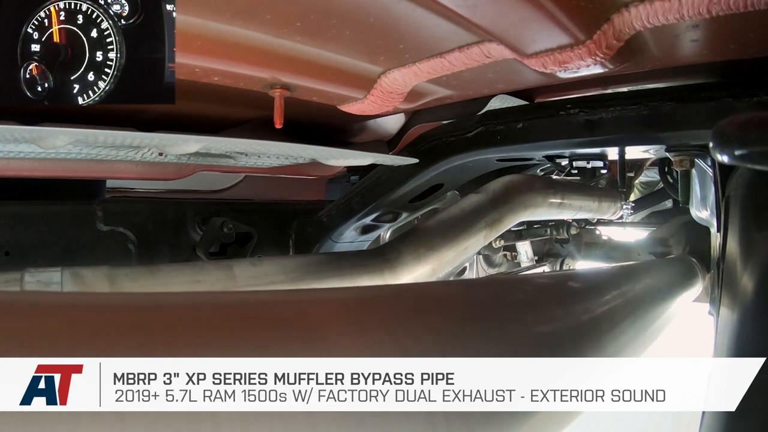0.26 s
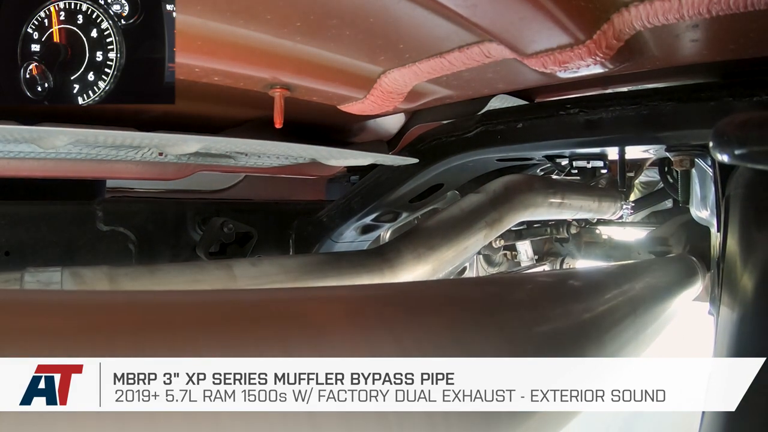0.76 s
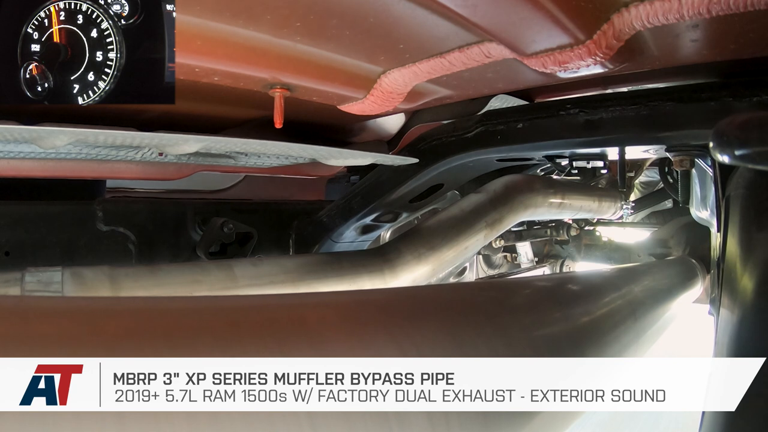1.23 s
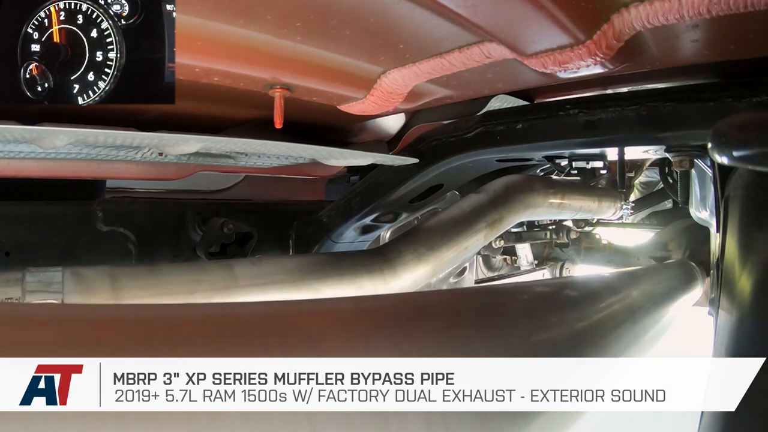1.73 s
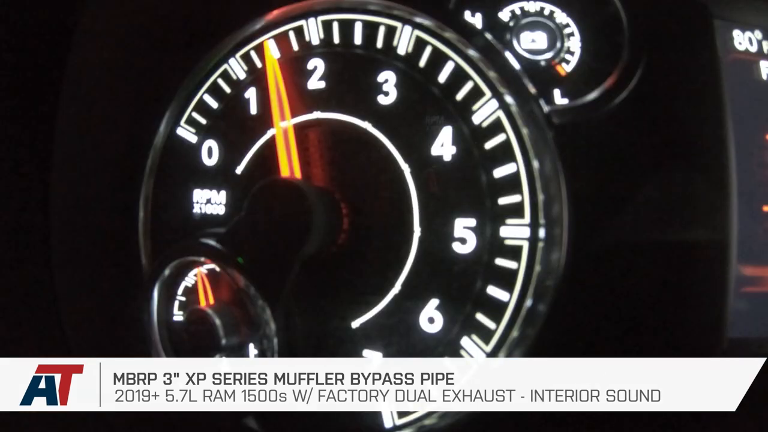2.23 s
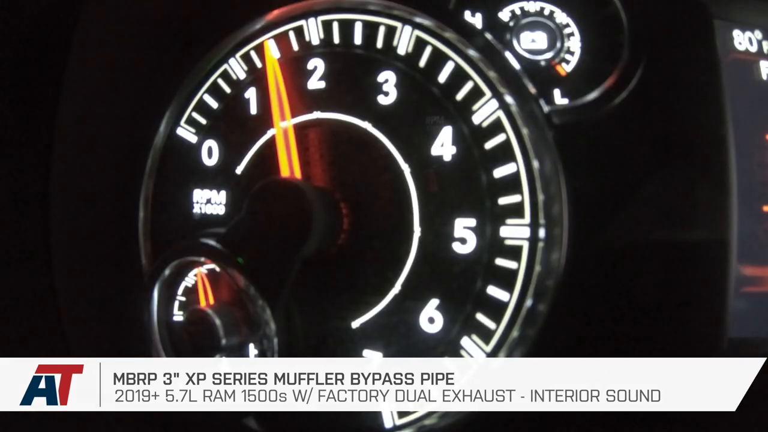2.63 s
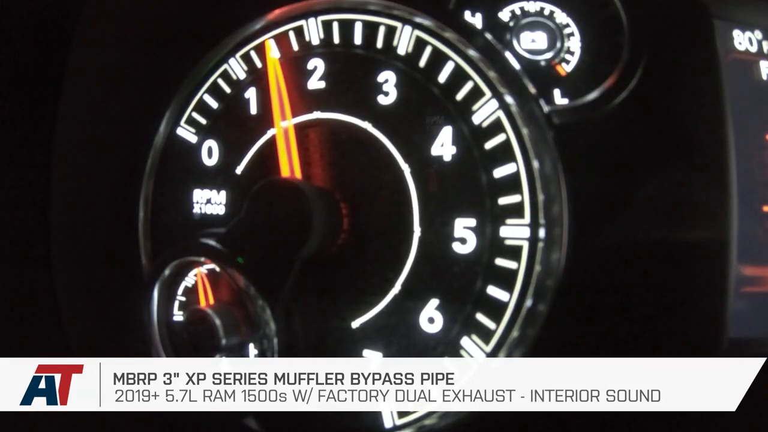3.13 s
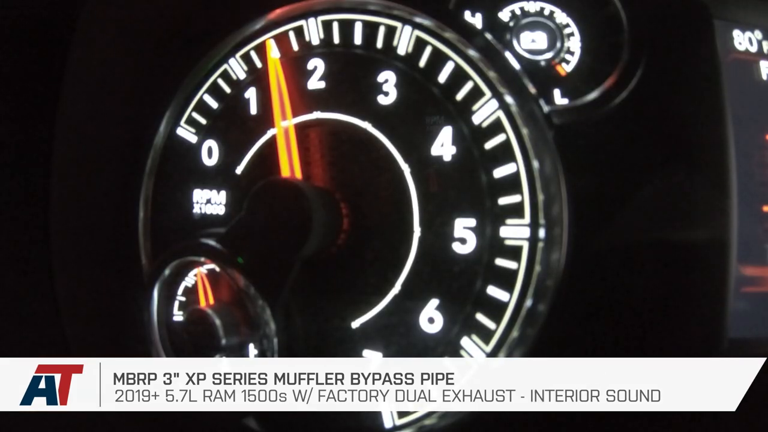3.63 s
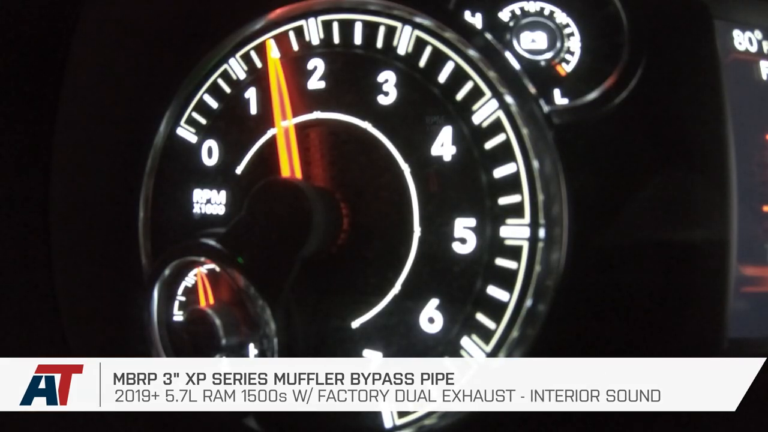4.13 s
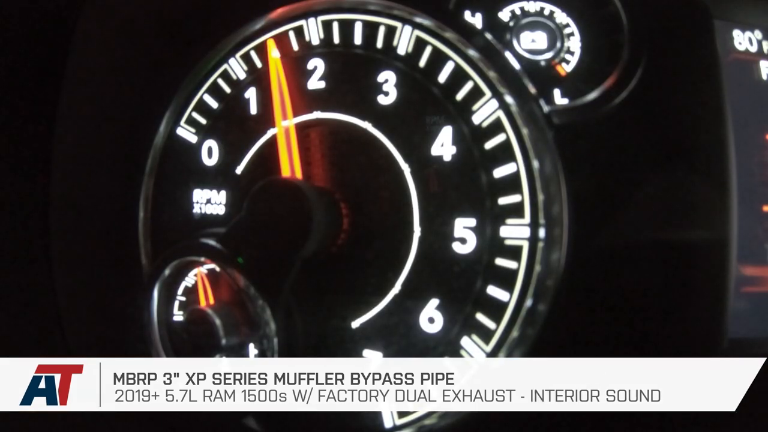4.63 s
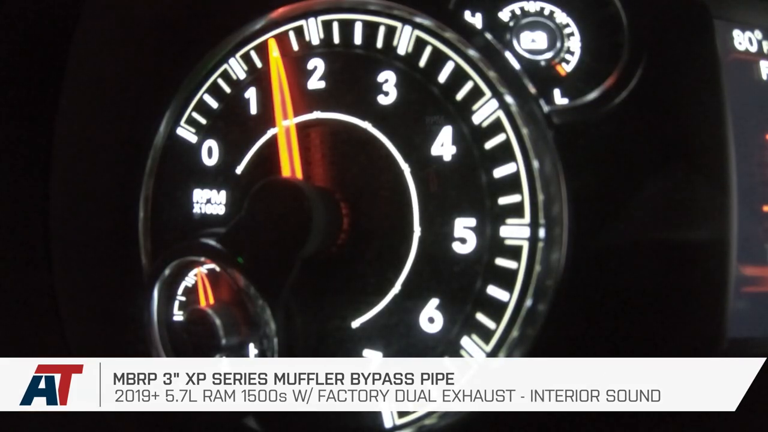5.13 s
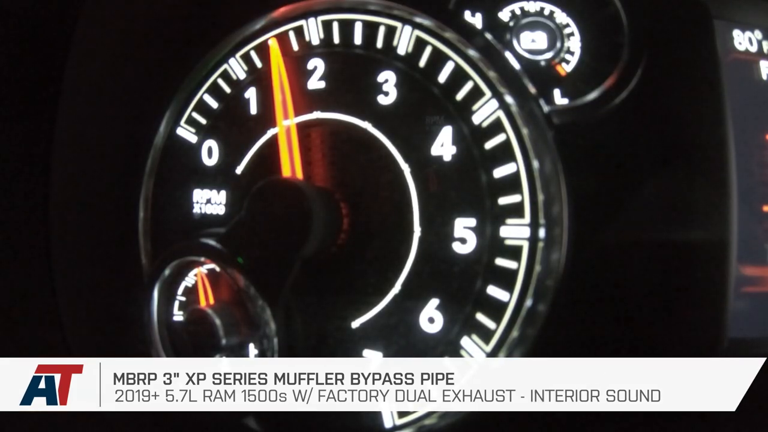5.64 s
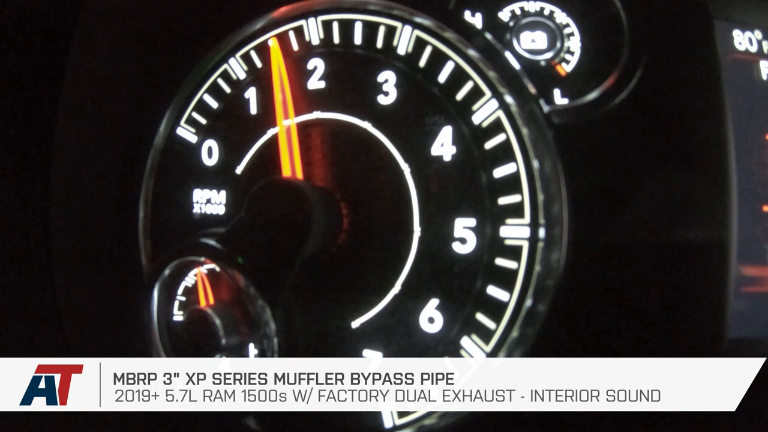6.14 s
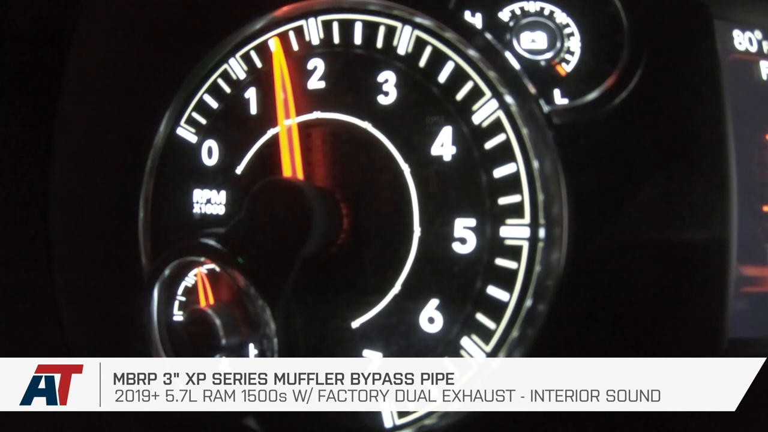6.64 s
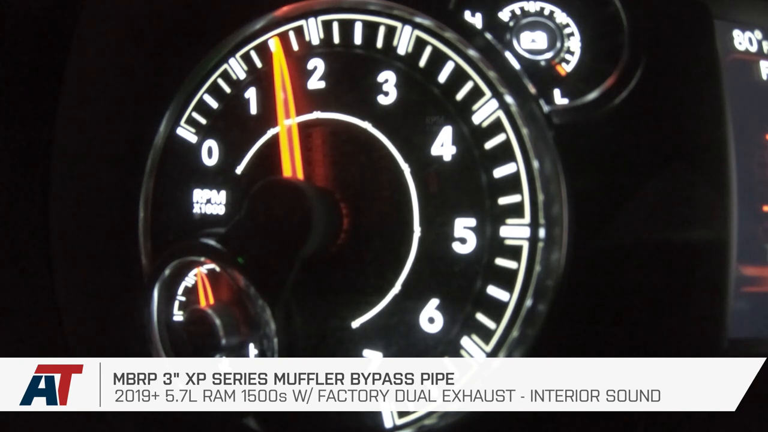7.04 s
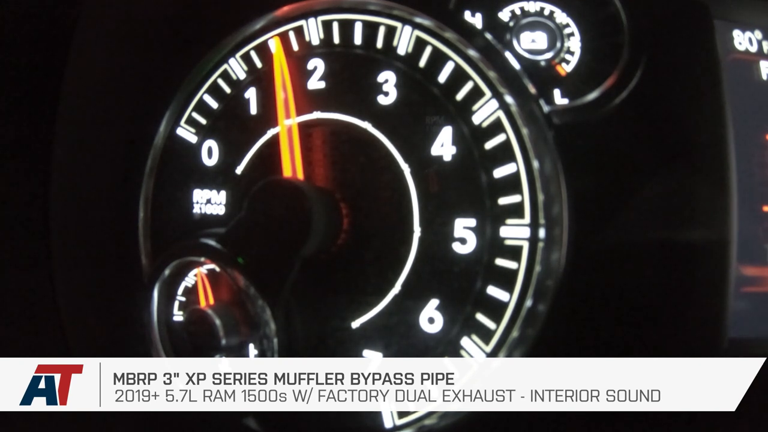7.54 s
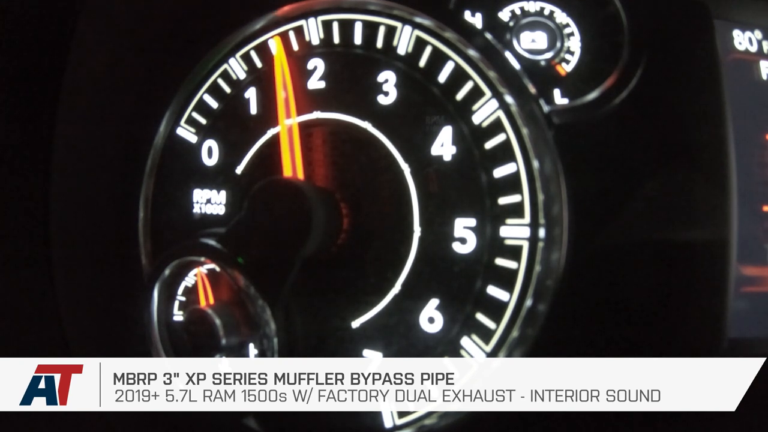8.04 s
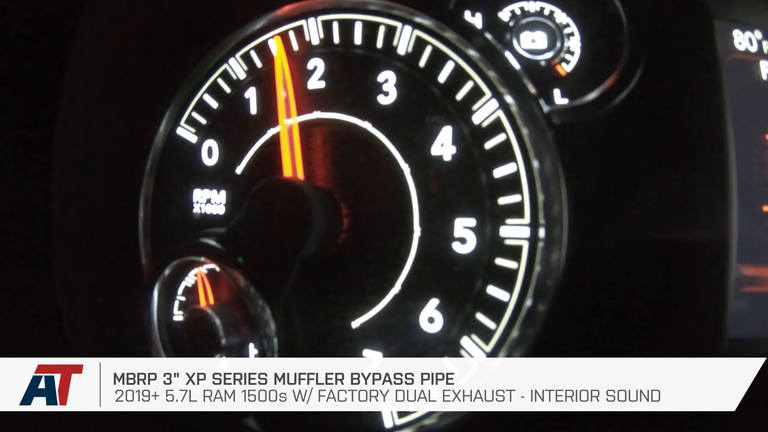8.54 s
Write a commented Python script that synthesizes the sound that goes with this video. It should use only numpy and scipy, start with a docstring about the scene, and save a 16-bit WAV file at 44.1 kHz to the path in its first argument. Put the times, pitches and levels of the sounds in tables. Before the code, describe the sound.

Close to the exhaust pipe beneath a pickup, a V8 engine idles with a loud, steady, pulsing rumble and a rush of gas. The microphone then moves inside the cab, and the engine drops to a muffled low hum that slowly rises a little in speed. A thin, faint whine lies over it, a slight hiss passes early on, and plastic trim ticks once near the end.

```python
"""Under the bed of a pickup, then in its cab: a V8 with a straight-through exhaust idles near 1700 rpm.
Below, the uneven pulses of the two banks make a loping drone, ring the pipe and release puffs of gas
hiss, while a heat shield ticks and air buffets the microphone. The sound then fades over to the cab,
where the idle slowly climbs. The body passes a deep hum and muffles the rest to a soft rumble; a faint
whine, a brief hiss and a tick of trim lie over it."""
import sys
import numpy as np
from scipy import signal
from scipy.fft import rfft, irfft, next_fast_len
from scipy.io import wavfile

SR = 44100
rng = np.random.default_rng(int(sys.argv[2]) if len(sys.argv) > 2 else 0)


def materialize(psi):
    """Save the field psi as 16-bit PCM at rate SR to the path in sys.argv[1].

    A 1-D psi becomes a single channel; in a 2-D psi each row is a channel.
    """
    bounded = np.clip(np.atleast_2d(psi).T, -1, 1)
    quanta = np.round(bounded * 32767).astype(np.int16)
    wavfile.write(sys.argv[1], SR, quanta)


N = 387198

# the eight exhaust pulses in firing order, the near bank the louder: (relative level [dB])
FIRING_DB = [-10.5, 0, -10, 0, -.5, -9, 0, -10]
REFERENCE_RPM = 1640   # cab levels change in step with the speed above or below this
FADE_S = (2.064, 2.309)


def from_db(db):
    """Decibels to amplitude ratio."""
    return 10 ** (np.asarray(db) / 20)


def rms_one(x):
    """Scale to rms 1."""
    return x / np.sqrt(np.mean(x ** 2) + 1e-20)


def seconds():
    """Time of every sample."""
    return np.arange(N) / SR


def in_time(rows):
    """A (time, value) curve at every sample."""
    return np.interp(seconds(), *np.transpose(rows))


def arch(middle_s, length_s):
    """A half sine that rises from 0 to 1 and falls back."""
    return np.cos(np.pi * np.clip((seconds() - middle_s) / length_s, -.5, .5))


def swells_db(rows):
    """Level change from smooth swells or sags."""
    return sum(db * arch(middle_s, length_s) for middle_s, length_s, db in rows)


def drift(rate_hz):
    """Random fluctuation: low-passed noise of rms 1."""
    step, settling = 100, 2000
    pole = np.exp(-2 * np.pi * rate_hz * step / SR)
    white = rng.standard_normal(N // step + settling + 2)
    slow = signal.lfilter([1], [1, -2 * pole, pole * pole], white)[settling:]
    return np.interp(np.arange(N) / step, np.arange(len(slow)), rms_one(slow))


def noise(spectrum, peaks=()):
    """Spectral shaping: noise with a broad envelope and resonant peaks; rms 1."""
    hz = np.maximum(np.fft.rfftfreq(2 * next_fast_len(N // 2 + 1), 1 / SR), 1)
    points = np.array(spectrum)
    db = np.interp(np.log(hz), np.log(points[:, 0]), points[:, 1])
    db -= 40 * np.log10(np.maximum(hz / points[-1, 0], 1))   # falls away above the last point
    for centre, width, height in peaks:
        db += height / (1 + (2 * (hz - centre) / width) ** 2)
    white = rng.standard_normal(2 * len(hz) - 2)
    return rms_one(irfft(rfft(white) * from_db(db))[:N])


def resonance(x, hz, width):
    """A damped oscillator with gain 1 at its peak."""
    r = np.exp(-np.pi * width / SR)
    feedback = [1, -2 * r * np.cos(2 * np.pi * hz / SR), r * r]
    return signal.lfilter(np.array([1, 0, -1]) * (1 - r * r) / 2, feedback, x + 1e-18)


def engine_cycles(rpm):
    """Four-stroke cycles run so far: one for two turns of the crank."""
    return np.cumsum(rpm) / 120 / SR


def drone(cycles, orders, waver, smear):
    """Fourier series: harmonics phased by the uneven firing of the two banks lope once a cycle."""
    out = np.zeros(N)
    slots = np.arange(len(FIRING_DB)) / len(FIRING_DB)
    for k, db in orders:
        phase = np.angle(np.sum(from_db(FIRING_DB) * np.exp(-2j * np.pi * k * slots)))
        lag = smear * max(k - len(FIRING_DB), 0) ** 2   # higher harmonics linger in the pipe
        out += from_db(db) * (1 + waver * drift(0.75)) * np.cos(2 * np.pi * k * cycles + phase - lag)
    return np.sqrt(2) * out


def pipe_ring(cycles, scatter_db, jitter_s):
    """Impulse excitation: each opening exhaust valve knocks the pipe modes, never twice quite alike."""
    # pipe modes: (frequency [Hz], bandwidth [Hz], relative level [dB])
    pipe_modes = [(480, 180, -3.5), (561, 45, 1.5), (630, 15, 0.5), (753, 20, 1.5), (807, 75, 5.5),
                  (840, 35, 0.5), (880, 24, -5.5)]
    firings = np.flatnonzero(np.diff(np.floor(cycles * len(FIRING_DB)))) + 1
    scatter, jitter = rng.standard_normal((len(firings), 2)).T
    knock_db = np.resize(np.roll(FIRING_DB, -1), len(firings)) / 2 + scatter_db * scatter
    onsets = np.clip(firings + (jitter_s * SR * jitter).astype(int), 0, N - 1)
    knocks = np.zeros(N)
    knocks[onsets] = from_db(knock_db)
    ringing = sum((-1) ** i * from_db(db) * resonance(knocks, hz, width)
                  for i, (hz, width, db) in enumerate(pipe_modes))
    return rms_one(signal.sosfilt(signal.butter(2, [430, 900], "band", fs=SR, output="sos"), ringing))


def gas_puffs(cycles, depth_db, bank_share, flicker_db):
    """Amplitude modulation: gas hiss swells just after each firing, more for the near bank."""
    # rushing exhaust gas: (frequency [Hz], relative density [dB])
    gas_spectrum = [(60, -5.5), (130, 5), (220, -0.5), (365, -5), (430, 4.5), (520, 1), (800, 1),
                    (1050, -8.5), (1600, -13.5), (3200, -24), (5500, -33), (7200, -41), (12000, -50),
                    (14000, -63.5)]
    # higher pipe modes that colour the gas: (frequency [Hz], bandwidth [Hz], boost [dB])
    gas_modes = [(820, 46, 2), (1207, 35, 5), (1428, 170, 7.5), (1890, 130, 5), (2290, 190, 4.5),
                 (2670, 77, 7.5), (3400, 360, 7), (4960, 130, 4), (7926, 16, 12.5)]
    count = len(FIRING_DB)
    firings = cycles * count
    puff_lag, bank_lag = 0.34, 0.3   # in firing intervals
    puff_db = depth_db * np.cos(2 * np.pi * (firings - puff_lag))
    bank_db = bank_share * np.interp(firings - bank_lag, np.arange(count), FIRING_DB, period=count)
    swell = from_db(puff_db + bank_db + flicker_db * drift(83))
    return rms_one(swell * noise(gas_spectrum, gas_modes))


def shield_ticks(per_s, scatter_db):
    """Free vibration: the shaken heat shield rings in tiny, dull ticks at random times."""
    hits = rng.random(N) < per_s / SR
    ticks = hits * from_db(scatter_db * np.clip(rng.standard_normal(N), -2, 2))
    ringing = resonance(ticks, 3400, 250) - resonance(ticks, 4800, 300)
    return rms_one(signal.sosfilt(signal.butter(2, 6000, fs=SR, output="sos"), ringing))


def air_buffet():
    """Pressure fluctuation: air buffeting the microphone makes a low rumble."""
    # buffeting air: (frequency [Hz], relative density [dB])
    buffet_spectrum = [(5, -9.5), (12, 1.5), (22, -2.5), (35, -12.5), (70, -10), (140, -18.5), (400, -55)]
    return from_db(-43 + 1.2 * drift(2.2)) * noise(buffet_spectrum)


def under_truck():
    """Superposition of the sources under the bed."""
    # engine speed: (time [s], speed [rpm])
    idle_speed = [(0, 1698.6), (2.4, 1708.2)]
    # exhaust harmonics, 8 being the firing rate: (order [per cycle], level [dB])
    exhaust_orders = [(3, -55.5), (5, -31), (6, -56), (7, -43.5), (8, -29.5), (9, -44.5), (10, -49.5),
                      (11, -47), (12, -57), (13, -50), (14, -51), (15, -54), (16, -55.5), (17, -48),
                      (18, -55), (19, -51), (20, -55), (21, -59.5), (22, -62), (23, -54.5), (24, -58.5),
                      (29, -61), (30, -57.5), (31, -66), (33, -58), (34, -64.5), (35, -58), (37, -61.5),
                      (40, -65.5), (41, -67), (43, -67.5), (46, -63.5)]
    cycles = engine_cycles(in_time(idle_speed))
    exhaust = drone(cycles, exhaust_orders, waver=0.024, smear=0.0196)
    ring = from_db(-58.5) * pipe_ring(cycles, scatter_db=0.5, jitter_s=.00007)
    gas = from_db(-44.5) * gas_puffs(cycles, depth_db=2.0, bank_share=0.19, flicker_db=1.1)
    ticks = from_db(-82) * shield_ticks(per_s=54, scatter_db=3.5)
    return exhaust + ring + gas + ticks + air_buffet()


def cab_hum(cycles, extra_rpm):
    """Low-frequency transmission: the body passes the firing hum, which eases as the speed climbs."""
    # engine harmonics in the cab: (order [per cycle], base level [dB])
    cab_orders = [(5, -52), (7, -67), (8, -42.7), (9, -63), (10, -69), (11, -68), (14, -72), (15, -73),
                  (16, -71), (17, -78), (20, -77), (21, -77), (23, -78), (24, -77), (26, -79), (29, -75),
                  (30, -77)]
    # the hum sags and recovers: (midpoint [s], duration [s], level change [dB])
    sags = [(5.05, 2.2, -2.5), (8.05, .9, -1.0)]
    gain_db = 0.64 - 0.0142 * extra_rpm + swells_db(sags)
    return from_db(gain_db) * drone(cycles, cab_orders, waver=.035, smear=.018)


def body_shake():
    """Random vibration: the shaking body rumbles, wandering in level and surging now and then."""
    # body vibration: (frequency [Hz], relative density [dB])
    shake_spectrum = [(6, -11.5), (17, 0.5), (30, -2.5), (42, -7.5), (54, -9), (72, -6.5), (88, -14),
                      (120, -20), (170, -32), (400, -59)]
    # surges: (midpoint [s], duration [s], level change [dB])
    surges = [(3.5, .6, 1), (4.85, 1.0, 3), (5.7, .5, 3.5), (7.3, .5, 3), (8.45, 0.9, 5.5)]
    return from_db(-48.5 + 0.76 * drift(1.5) + swells_db(surges)) * noise(shake_spectrum)


def muffled_engine(cycles, extra_rpm):
    """Transmission loss: the body dulls the engine noise, which throbs and grows with speed."""
    # engine noise let into the cab: (frequency [Hz], relative density [dB])
    cab_spectrum = [(60, 3.5), (140, 1.5), (210, -2), (270, -3), (400, -5.5), (510, -13.5), (700, -14),
                    (850, -13), (960, -21.5), (1450, -27), (2000, -37), (3200, -41.5), (5000, -50),
                    (8500, -48.5), (11000, -63.5)]
    # ringing body panels: (frequency [Hz], bandwidth [Hz], boost [dB])
    panel_modes = [(596, 32, 1.5), (720, 44, 5), (1007, 50, 3.5), (1245, 61, 3), (1510, 110, 2),
                   (2260, 150, 1.5)]
    throb_db = .55 * np.cos(2 * np.pi * len(FIRING_DB) * cycles) + 0.35 * drift(25)
    return from_db(-56.5 + 0.0132 * extra_rpm + throb_db) * noise(cab_spectrum, panel_modes)


def unsteady_tone(hz, flutter_hz, steady):
    """Random modulation: a sine's amplitude and phase wander about a steady core; rms 1."""
    phase = 2 * np.pi * np.cumsum(hz) / SR
    return rms_one((steady + drift(flutter_hz)) * np.cos(phase) + drift(flutter_hz) * np.sin(phase))


def whine(rpm, cycles_per_turn):
    """Rotational tone: an engine-bay whine and its lower octave rise in pitch and fade with speed."""
    hz = cycles_per_turn * rpm / 60
    extra_rpm = rpm - REFERENCE_RPM
    upper = from_db(-73 - 0.0248 * extra_rpm) * unsteady_tone(hz, flutter_hz=17, steady=0.97)
    lower = from_db(-72.5 - 0.063 * extra_rpm) * unsteady_tone(hz / 2, flutter_hz=14, steady=0.66)
    return upper + lower


def soft_hiss(steepness, flicker_db):
    """Enveloped broadband noise: a faint, bright hiss swells and dies."""
    # the hiss: (frequency [Hz], relative density [dB])
    hiss_spectrum = [(600, -16), (2000, -2.5), (5000, -4.5), (9000, -3.5), (13000, -6.5), (16000, -10)]
    # its swell and fainter afterswell: (midpoint [s], duration [s], peak level [dB])
    swells = [(3.217, 0.32, -74.5), (3.52, 0.6, -90)]
    envelope = sum(from_db(db) * arch(mid_s, length_s) ** steepness for mid_s, length_s, db in swells)
    return envelope * from_db(flicker_db * drift(50)) * noise(hiss_spectrum)


def trim_tick(at_s, decay_s, gain_db):
    """Damped resonance: a short burst excites two modes of the plastic trim."""
    age = seconds() - at_s
    burst = rng.standard_normal(N) * (age > 0) * np.exp(-np.abs(age) / decay_s)
    return from_db(gain_db) * (resonance(burst, 2000, 300) - .5 * resonance(burst, 3050, 400))


def in_cab():
    """Superposition of the sounds in the cab."""
    # engine speed: (time [s], speed [rpm])
    climbing_speed = [(2.3, 1563), (6.7, 1667.5), (8.78, 1700)]
    rpm = in_time(climbing_speed)
    extra_rpm = rpm - REFERENCE_RPM
    cycles = engine_cycles(rpm) + .271   # starts partway through a cycle
    rumble = cab_hum(cycles, extra_rpm) + body_shake() + muffled_engine(cycles, extra_rpm)
    tick = trim_tick(at_s=7.597, decay_s=.007, gain_db=-60.5)
    return rumble + whine(rpm, cycles_per_turn=29.14) + soft_hiss(steepness=1.3, flicker_db=0.7) + tick


def scene():
    """A linear crossfade leads from under the bed into the cab."""
    inside = np.interp(seconds(), FADE_S, [0, 1])
    return ((1 - inside) * under_truck() + inside * in_cab())[None]


def record(dry):
    """Band limiting: a steep low-pass removes the treble above 17 kHz."""
    return signal.sosfilt(signal.cheby2(12, 70, 17000, fs=SR, output="sos"), dry)


dry = scene()
out = record(dry)
materialize(out)
```